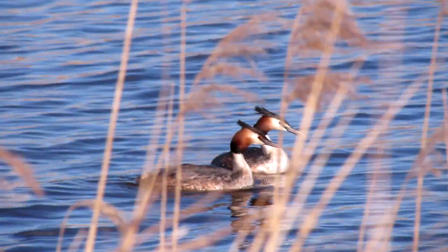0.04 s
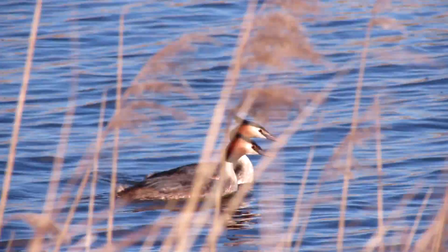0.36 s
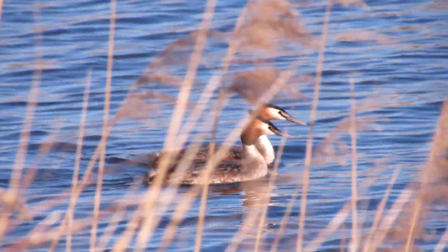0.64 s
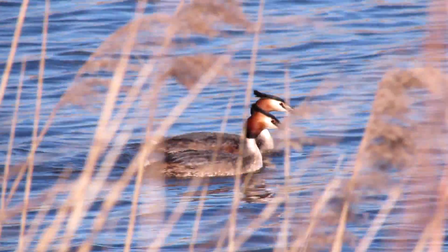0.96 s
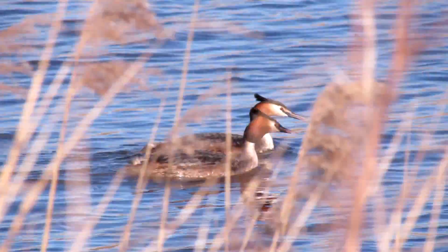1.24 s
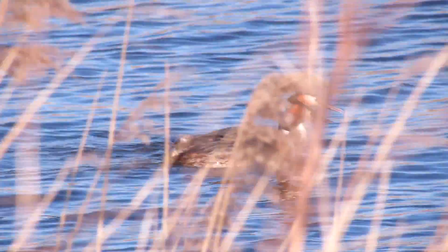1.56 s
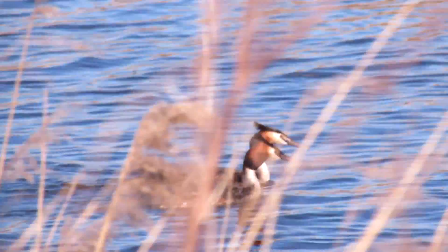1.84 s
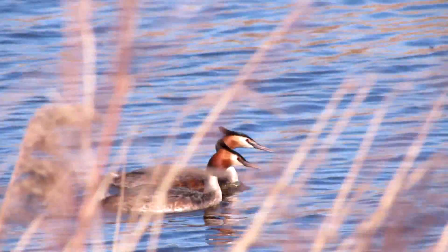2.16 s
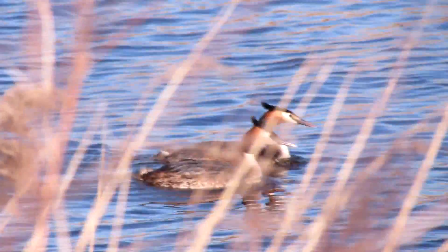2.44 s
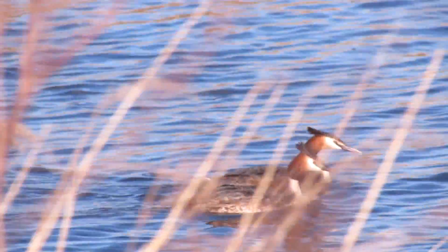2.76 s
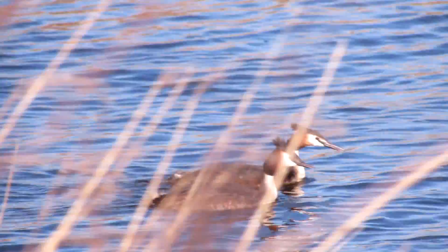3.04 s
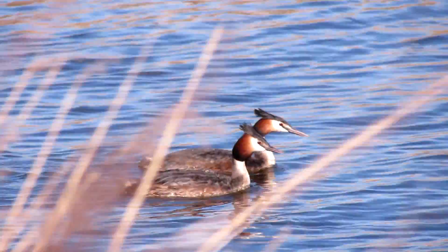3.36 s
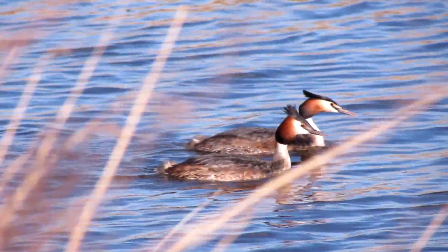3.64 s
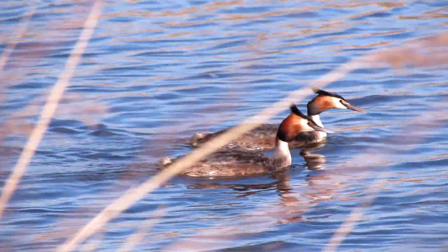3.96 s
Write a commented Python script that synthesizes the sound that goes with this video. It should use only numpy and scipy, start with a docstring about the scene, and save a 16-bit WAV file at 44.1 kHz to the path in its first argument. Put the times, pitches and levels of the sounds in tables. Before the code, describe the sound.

Gusts of wind buffet the microphone with low thumps over a soft hiss of lakeside reeds. Faint, short waterbird honks and squeaks repeat irregularly, with a few distant whistles and, later, thin chirps from small birds.

```python
"""A reedy lake on a windy day. From the start, gusts buffet the microphone's two ports in opposite
phase over a soft hiss of reeds and ripples, and far whistles quaver. From 0.4 s hard eddies thump
the ports. Waterbirds join with nasal, falling honks and short squeaks, later often paired squeak
then honk. One hoarse bark comes at 1.5 s; small birds chirp from then on. The banks echo the birds."""
import sys
import numpy as np
from scipy import signal
from scipy.fft import rfft, irfft
from scipy.io import wavfile
from scipy.ndimage import uniform_filter1d

SR = 44100
rng = np.random.default_rng(int(sys.argv[2]) if len(sys.argv) > 2 else 0)


def pcm_store(signal):
    """Save signal as 16-bit PCM."""
    levels = np.round(np.clip(np.atleast_2d(signal), -1, 1) * 32767)
    wavfile.write(sys.argv[1], SR, levels.astype(np.int16).T)


N = 176400
TIME = np.arange(N) / SR

# port the wind favours: (time [s], left minus right [dB])
PORT_BALANCE = [(.4, 0), (1.75, -2.5), (2.3, 4), (2.7, -4), (3.34, 1), (3.6, -6)]


def from_db(db):
    """Decibels to gain."""
    return 10 ** (np.asarray(db) / 20)


def rms_one(x):
    """Scale to unit rms."""
    return x / np.sqrt(np.mean(x ** 2) + 1e-20)


def in_time(rows):
    """A curve's value at every sample."""
    return np.interp(TIME, *np.transpose(rows))


def at_hz(rows, hz, column=1):
    """Interpolate a spectrum column over log frequency."""
    rows = np.array(rows)
    return np.interp(np.log(hz), np.log(rows[:, 0]), rows[:, column])


def panned(db):
    """Left and right gains for a level difference."""
    return from_db(np.array([[.5], [-.5]]) * db)


def drift(corner_hz):
    """Low-passed random wander, unit rms."""
    hop = 40
    pole = np.exp(-2 * np.pi * corner_hz * hop / SR)
    white = rng.standard_normal(N // hop + 2002)
    slow = signal.lfilter([1], [1, -2 * pole, pole * pole], white)[2000:]
    return np.interp(np.arange(N) / hop, np.arange(len(slow)), rms_one(slow))


def noise_bands(lowest_hz, count):
    """Yield half-octave bands: centre [Hz], two independent unit noises."""
    white = rng.standard_normal((2, 2, N + SR // 2))
    for k in range(count):
        low_hz = lowest_hz * 2 ** (k / 2)
        high_hz = min(low_hz * np.sqrt(2), SR / 2 - 1000)
        sos = signal.butter(3, [low_hz, high_hz], "band", fs=SR, output="sos")
        yield low_hz * 2 ** .25, rms_one(signal.sosfilt(sos, white[k % 2])[:, -N:])


def swell(u, attack, release):
    """Smooth envelope over u = 0..1; attack and release are shares of the note."""
    rise = np.sin(np.pi / 2 * np.clip(u / attack, 0, 1))
    return rise * np.sin(np.pi / 2 * np.clip((1 - u) / release, 0, 1))


def add(out, start_s, note):
    """Mix a note in at its time."""
    i = max(int(start_s * SR), 0)
    out[i:i + len(note)] += note[:max(N - i, 0)]


def tone(pitch_hz, db):
    """Pure whistled note on a pitch track."""
    envelope = swell(np.linspace(0, 1, len(pitch_hz)), attack=0.19, release=0.59)
    return from_db(db) * np.sqrt(2) * envelope * np.sin(2 * np.pi * np.cumsum(pitch_hz) / SR)


def wind():
    """Eddies push on one port and pull on the other; stronger gusts reach higher in pitch."""
    # wind strength at the microphone: (time [s], level [dB])
    gusts = [(0.05, -30.5), (0.07, -32.5), (0.21, -37), (0.25, -25.5), (0.28, -39), (0.41, -26),
             (0.72, -40), (1.03, -34), (1.06, -37.5), (1.13, -24), (1.19, -46.5), (1.24, -29.5),
             (1.28, -49.5), (1.3, -29.5), (1.37, -52.5), (1.42, -32.5), (1.46, -44), (1.73, -42),
             (1.95, -54.5), (1.99, -33.5), (2.01, -45.5), (2.27, -28), (2.49, -34), (2.55, -27.5),
             (2.66, -43), (2.76, -35), (2.93, -51), (3.07, -40.5), (3.22, -55.5), (3.28, -26), (3.37, -22),
             (3.4, -36.5), (3.56, -31.5), (3.67, -55.5), (3.7, -32), (3.83, -31), (3.94, -62.5),
             (4.0, -31.5)]
    # buffeting at usual strength: (frequency [Hz], half-octave level [dB], gust slope [dB/dB])
    buffet = [(20.2, -45.5, -0.46), (39.3, -34.5, 0.5), (70, -26, 0.26), (152.3, -26.5, 1.0),
              (282, -35.5, 1.5942), (378, -47.5, 1.04), (684, -64, 1.04)]
    usual_db, eddy_db, flutter_db, in_phase_db = -32.5, 3.5, 2.08, -9.5
    force_db = in_time(gusts) - usual_db + eddy_db * np.clip(drift(corner_hz=46), -2, 2)
    out = 0
    for hz, pair in noise_bands(18, count=11):
        power = uniform_filter1d(pair ** 2, size=int(SR * max(.06, 6 / hz)))
        opposed, common = pair / np.sqrt(power + 1e-9)
        band_db = at_hz(buffet, hz) + at_hz(buffet, hz, column=2) * force_db + flutter_db * drift(15.4)
        out = out + from_db(band_db) * (opposed * [[1], [-1]] + from_db(in_phase_db) * common)
    return out * panned(in_time(PORT_BALANCE))


def reeds():
    """A wide, smooth hiss of reeds and ripples that grows slowly;
    the recorder's limiter briefly ducks it at the loudest gust (3.3 s)."""
    # hiss spectrum: (frequency [Hz], half-octave level [dB])
    spectrum = [(200, -63), (500, -65), (800, -61), (1250, -66.5), (1800, -64.5), (2800, -70.5),
                (4500, -71), (8000, -71), (12000, -73), (16000, -76)]
    # slow rise, with the limiter's duck drawn in: (time [s], gain [dB])
    gain_curve = [(.05, -2), (.7, 0), (1.4, 2.16), (3.31, 3), (3.35, -1.5), (3.7, 3)]
    # stereo likeness: (frequency [Hz], left-right correlation [-1..1])
    likeness = [(800, -0.13), (5000, 0.098), (12000, -0.09)]
    flutter_db = 0.5
    out = 0
    for hz, (mid, side) in noise_bands(180, count=13):
        alike = at_hz(likeness, hz)
        band = np.sqrt((1 + alike) / 2) * mid + np.sqrt((1 - alike) / 2) * side * [[1], [-1]]
        out = out + from_db(at_hz(spectrum, hz) + flutter_db * drift(14)) * band
    return out * from_db(in_time(gain_curve)) * panned(db=-0.9)


def whistles():
    """Far, hoarse whistles quaver and droop."""
    # whistles: (time [s], length [s], pitch [Hz], level [dB])
    notes = [(0.018, 0.2, 1940, -62.5), (0.199, 0.21, 2087, -65), (1.175, 0.16, 1695, -66),
             (3.36, 0.51, 1890, -71)]
    quaver_hz, quaver_depth, fall, roughness = 58, 0.028, 0.2, .022
    out, waver = np.zeros(N), drift(430)
    for start_s, length_s, hz, db in notes:
        u = np.linspace(0, 1, int(length_s * SR))
        quaver = np.sin(2 * np.pi * quaver_hz * length_s * u)
        jitter = roughness * np.roll(waver, -int(start_s * SR))[:len(u)]
        pitch_hz = hz * (1 - fall * u ** 1.8 + quaver_depth * quaver + jitter)
        add(out, start_s, tone(pitch_hz, db) * (1 + 0.13 * quaver))
    return out


def thumps():
    """A hard eddy pushes on one port and pulls on the other just after; bigger eddies sound lower."""
    # hard eddies: (time [s], upper band edge [Hz], peak [dB])
    eddies = [(0.397, 330, -9.5), (.421, 390, -10), (1.127, 300, -19), (1.696, 115, -11),
              (1.745, 106, -10.5), (1.983, 262, -22), (2.254, 318, -6.5), (2.355, 408, -17),
              (2.375, 385, -14.5), (2.506, 217, -29), (3.337, 382, -7), (3.36, 300, -15), (3.712, 350, -17),
              (3.842, 310, -15.5)]
    width_octaves, port_lag_s = 1.8, .0003
    kicks = np.zeros(N)
    for start_s, hz, db in eddies:
        sos = signal.butter(3, [hz / 2 ** width_octaves, hz], "band", fs=SR, output="sos")
        pulse = signal.sosfilt(sos, signal.unit_impulse(SR // 10))
        add(kicks, start_s, from_db(db) * rng.choice([-1, 1]) * pulse / np.abs(pulse).max())
    return np.array([kicks, -np.roll(kicks, int(port_lag_s * SR))]) * panned(in_time(PORT_BALANCE))


def calls(notes, throat, fall, bend, jitter, rasp, attack, release):
    """A buzzing voice sags in pitch behind fixed throat resonances; rasp is noise puffed each cycle."""
    out, waver, air = np.zeros(N), drift(140), rng.standard_normal(N)
    for start_s, length_s, hz, db in notes:
        u = np.linspace(0, 1, int(length_s * SR))
        span = int(start_s * SR) + np.arange(len(u))
        pitch_hz = hz * (1 - fall * u ** bend) * (1 + jitter * waver.take(span, mode="wrap"))
        phase = 2 * np.pi * np.cumsum(pitch_hz) / SR
        harmonics = range(1, int(throat[-1][0] / hz) + 1)
        buzz = sum(from_db(at_hz(throat, k * pitch_hz)) * np.cos(k * phase) for k in harmonics)
        puff_spectrum = rfft(air.take(span, mode="wrap") * (1 + np.cos(phase)))
        bin_hz = 1 + np.arange(len(puff_spectrum)) * SR / len(u)
        breath = irfft(puff_spectrum * from_db(at_hz(throat, bin_hz)), len(u))
        voice = rms_one(rms_one(buzz) + rasp * rms_one(breath))
        add(out, start_s, from_db(db) * swell(u, attack, release) * voice)
    return out


def honks():
    """Nasal, falling waterbird honks with little rasp."""
    # honks: (time [s], length [s], pitch [Hz], level [dB])
    notes = [(.487, 0.12, 259.3, -61.5), (1.305, .085, 285.6, -59), (1.95, 0.088, 286, -56),
             (2.272, 0.042, 272, -59), (2.548, 0.088, 286.6, -55), (3.205, 0.096, 256.8, -52.5),
             (3.482, 0.069, 278.4, -56), (3.848, 0.094, 268.6, -56)]
    # throat response: (frequency [Hz], gain [dB])
    throat = [(250, -22), (750, -1.5), (1150, -12.5), (1500, -3.5), (1850, 3.5), (2200, -2.5), (2700, -5.5),
              (3200, -18.5), (6000, -23)]
    return calls(notes, throat, fall=.115, bend=1.13, jitter=0.012, rasp=.22, attack=0.21, release=.6)


def squeaks():
    """Short, high waterbird calls that drop toward the end."""
    # squeaks: (time [s], length [s], pitch [Hz], level [dB])
    notes = [(.748, 0.057, 774, -58), (1.01, 0.064, 782, -54), (1.273, 0.024, 784, -46.5),
             (1.672, 0.0097, 686, -50), (2.225, 0.023, 770, -50), (2.516, .032, 793, -46.5),
             (3.468, 0.023, 763, -48), (3.829, 0.028, 756, -47)]
    # throat response: (frequency [Hz], gain [dB])
    throat = [(400, -8), (760, 7), (1150, -24), (1550, 2), (2050, 10), (2350, 7), (3000, -17.5),
              (4500, -14), (7000, -46)]
    return calls(notes, throat, fall=.155, bend=2, jitter=.008, rasp=.42, attack=0.52, release=0.53)


def bark():
    """One nearer, hoarse bark, almost as much breath as buzz."""
    # bark: (time [s], length [s], pitch [Hz], level [dB])
    notes = [(1.527, 0.031, 242.1, -42.5)]
    # throat response: (frequency [Hz], gain [dB])
    throat = [(250, -22), (700, 14.5), (1180, 15.5), (1400, -1), (1650, 10.5), (1950, 16), (2400, 7),
              (2850, 3.5), (3300, -29), (6000, -40)]
    return calls(notes, throat, fall=0.097, bend=1, jitter=0.023, rasp=0.91, attack=0.34, release=0.49)


def small_birds():
    """Chirps fall or rise, steep at the high end, flat at the low; their loudness flickers."""
    # chirps: (time [s], length [s], first pitch [Hz], last pitch [Hz], level [dB])
    chirps = [(1.552, 0.09, 4620, 4260, -70), (2.209, 0.12, 4670, 4260, -70.5),
              (2.534, 0.056, 6000, 5150, -70), (2.767, 0.12, 2850, 4430, -70.5),
              (2.87, 0.1, 4570, 4250, -66.5), (3.195, 0.05, 6700, 5100, -67),
              (3.546, 0.084, 4620, 4200, -66.5), (3.863, 0.059, 6470, 5100, -66.5),
              (3.923, 0.021, 4950, 3900, -61)]
    flicker_db = 3
    out, waver = np.zeros(N), drift(390)
    for start_s, length_s, first_hz, last_hz, db in chirps:
        u = np.linspace(0, 1, int(length_s * SR))
        height = (u if last_hz > first_hz else 1 - u) ** 2
        pitch_hz = min(first_hz, last_hz) + abs(first_hz - last_hz) * height
        jitter = 0.015 * np.roll(waver, -int(start_s * SR))[:len(u)]
        add(out, start_s, tone(pitch_hz * (1 + jitter), db))
    return out * from_db(flicker_db * np.clip(drift(60), -2, .5))


def shore(x):
    """Scattered echoes from the banks, different on each side."""
    t60_s, cutoff_hz = 0.35, 16000
    tail = rng.standard_normal((2, SR)) * from_db(-60 * TIME[:SR] / t60_s)
    tail /= np.sqrt(np.sum(tail ** 2, axis=1, keepdims=True))
    tail = signal.sosfilt(signal.butter(1, cutoff_hz, fs=SR, output="sos"), tail)
    return signal.fftconvolve(x[None], tail, axes=1)[:, :N]


def scene():
    """Birds over the water to the right, reeds all round, wind on the microphone."""
    voices = squeaks() + honks() + bark() + small_birds()
    far = whistles()
    echoes = shore(from_db(-7) * voices + from_db(-3) * far)
    return (voices + far + echoes) * panned(db=-5.5) + reeds() + wind() + thumps()


def record(dry):
    """Soft limit on the strongest buffets, abrupt opening, steep treble cut."""
    start_s, fade_s, cutoff_hz = .047, 0.0032, 15700
    rounded = dry / (1 + dry ** 8) ** (1 / 8)
    opened = rounded * np.clip((TIME - start_s) / fade_s, 0, 1)
    return signal.sosfilt(signal.ellip(10, .1, 80, cutoff_hz, fs=SR, output="sos"), opened)


dry = scene()
out = record(dry)
pcm_store(out)
```